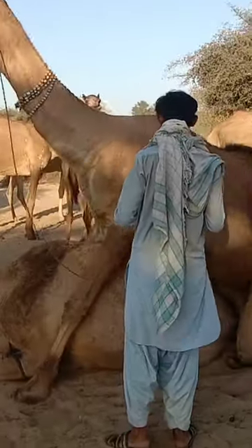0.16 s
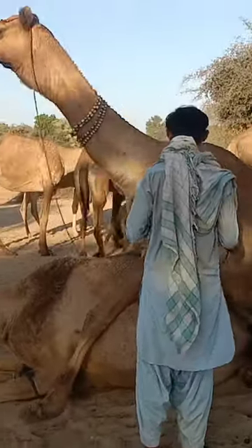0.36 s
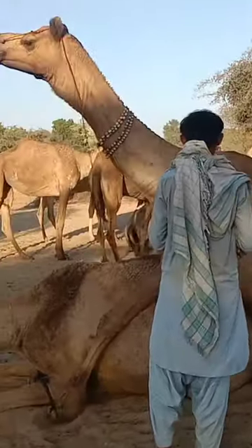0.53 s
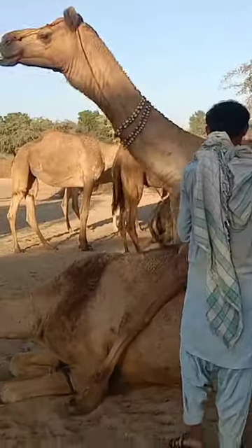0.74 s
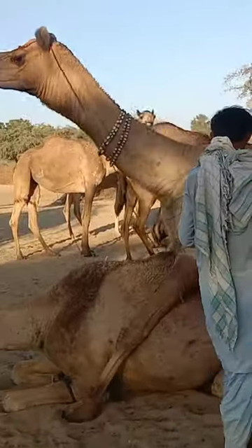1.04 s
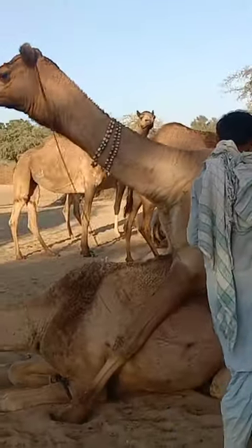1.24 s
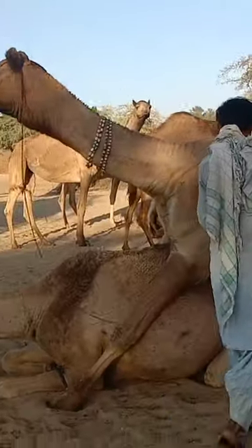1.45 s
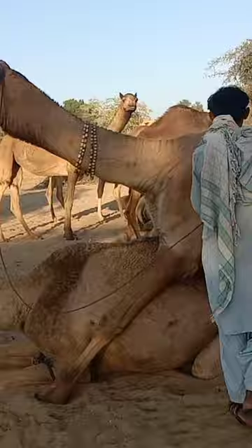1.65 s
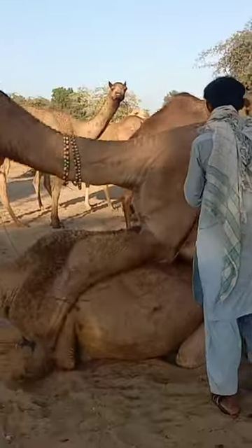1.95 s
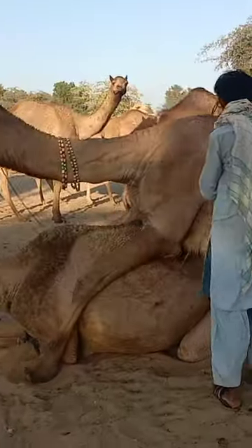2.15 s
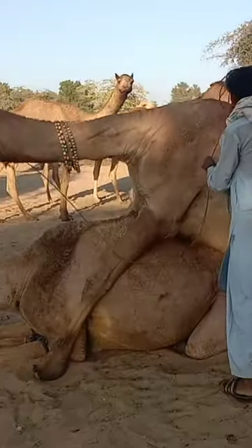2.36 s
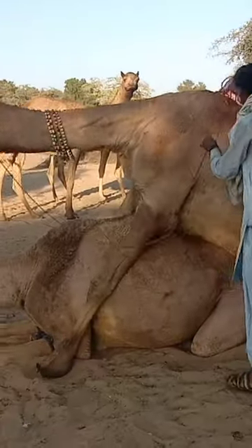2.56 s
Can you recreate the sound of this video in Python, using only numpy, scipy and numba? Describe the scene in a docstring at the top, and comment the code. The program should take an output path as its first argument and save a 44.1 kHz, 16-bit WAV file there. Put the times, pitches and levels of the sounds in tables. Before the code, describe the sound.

A camel lets out one long, low bellow a few metres away on open sand. The groan pulses and gurgles roughly, grows raspier with wet breath, and closes with a brief thin wheeze.

```python
"""Open sand, a few metres from a camel that gives one long, rough bellow.
Its larynx beats unevenly near 95 Hz and hums through the throat; each beat flaps loose tissue that
rings the open mouth, now and then with a hard slap. Wet air rasps between the beats and a thin wheeze
closes the call. The ground and nearby bodies add a short echo over a very quiet bed of open air."""
import sys
import numpy as np
from scipy import signal
from scipy.fft import rfft, irfft
from scipy.io import wavfile
from scipy.ndimage import uniform_filter1d, minimum_filter1d
from numba import njit

SR = 44100
rng = np.random.default_rng(int(sys.argv[2]) if len(sys.argv) > 2 else 0)


def bounce(signal):
    """Save signal as a 16-bit WAV file at the path given by the first command-line argument."""
    frames = np.transpose(np.atleast_2d(signal))
    limited = np.clip(frames, -1, 1)
    pcm = np.round(limited * 32767).astype(np.int16)
    wavfile.write(sys.argv[1], SR, pcm)


N = 119070

# throat hum, the third harmonic of the larynx: time_s, pitch_hz
HUM_PITCH = [(0.2,223.2),(0.28,267.9),(0.37,283.6),(0.44,313.7),(0.64,305),(0.73,320.6),(0.82,304.1),(0.88,282.4),(0.97,302.3),(1.04,271.7),(1.31,266.8),(1.5,290.8),(1.65,275.1),(2.12,271.3),(2.21,294.1),(2.3,284.4),(2.4,266),(2.47,207.6)]
# envelope of the soft flaps, before their gain: time_s, level_db
FLUTTER_LEVEL = [(0.19,-81),(0.205,-39),(0.27,-25.5),(0.36,-17),(0.5,-22.5),(0.68,-25),(0.81,-23),(0.87,-28),(1.0,-23.5),(1.22,-25),(1.36,-24),(1.5,-25),(1.63,-25.5),(1.95,-24),(2.1,-26),(2.27,-21),(2.425,-28.5),(2.47,-53),(2.53,-90)]
# hard slaps of loose tissue: start_s, level_db
HARD_SLAPS = [(0.2292, -20.5), (0.2861, -13), (0.3239, -9), (0.353, -19.5), (0.3702, -10.5), (0.3901, -9),
              (0.4077, -10.5), (0.4251, -9), (0.4541, -12.5), (0.4733, -11), (0.5026, -10), (0.5857, -6.5),
              (0.6063, -9), (0.6611, -7.0), (0.6717, -6), (0.6806, -9.0), (0.6905, -6.5), (0.7551, -6),
              (0.7745, -6), (0.7951, -8), (0.8143, -6), (0.8845, -10.5), (0.946, -6.5), (0.9854, -10),
              (0.9959, -10.0), (1.0169, -10.0), (1.0287, -10), (1.0714, -10), (1.0822, -10.0),
              (1.1376, -8.5), (1.1712, -10.5), (1.2752, -8.5), (1.2985, -7.5), (1.3797, -9), (1.4085, -8),
              (1.4431, -8), (1.455, -10.5), (1.4925, -9), (1.5137, -6.5), (1.5411, -6.5), (1.5869, -8.5),
              (1.6267, -8.5), (1.6585, -8), (1.6918, -8.5), (1.7098, -10), (1.7385, -11), (1.7619, -9),
              (1.7814, -5), (1.8341, -12.5), (1.8519, -7.5), (1.8753, -9.5), (1.8931, -7.5),
              (1.9046, -12.5), (1.9219, -11), (1.9339, -7), (1.949, -9), (2.066, -8.5), (2.0833, -8),
              (2.0978, -1.5), (2.1255, -11.5), (2.1326, -9), (2.1438, -5.5), (2.1765, -9), (2.1857, -10.5),
              (2.2146, -2.5), (2.229, -8.5), (2.2481, -2.5), (2.2713, -8.5), (2.285, -7), (2.3098, -11),
              (2.3284, -10.0), (2.3722, -12.5), (2.3847, -12)]
# open-mouth resonances, two for the jaw, then the tongue's: centre_hz, width_hz, gain_db
MOUTH_FORMANTS = [(833.6,163,-8),(924.2,108,8),(1213.4,49,-2),(1419,88,-1.5),(1541,90,-0.5),(1642,42,-4)]
# mouth shape, retuning those resonances: time_s, jaw_ratio, tongue_ratio, nasal_db
MOUTH_SHAPE = [(0.2,0.74,0.86,-10),(0.36,1.036,0.97,-13),(0.65,1.063,1.064,-19.5),(0.8,1,1.043,-16),(0.9,0.99,0.93,-15),(1.05,0.96,0.96,-19),(1.22,1.057,1.01,-15),(1.4,0.95,0.97,-18.5),(1.53,0.995,1.03,-18.5),(1.76,0.98,0.96,-28),(2.03,0.97,0.95,-19),(2.28,1.037,1.003,-13.5),(2.46,0.88,0.91,-11)]
# shared envelope of boom, hum and thud: time_s, level_db
THROAT_LEVEL = [(0.16,-68),(0.205,-39),(0.26,-30),(0.35,-26),(0.45,-28.5),(0.62,-30.5),(0.76,-30),(0.88,-31.5),(0.97,-27.5),(1.09,-26.5),(1.25,-31.5),(1.45,-29.5),(1.72,-29.5),(2.03,-27.5),(2.09,-27.5),(2.43,-29),(2.49,-49),(2.53,-100.5)]
# throat resonances at the average pitch: centre_hz, width_hz, gain_db
THROAT_FORMANTS = [(187.5,6.5,-5.5),(230,45,-4),(273,17,2.5),(398,15,-14)]
# soft knocks before the voice catches, before their gain: start_s, level_db
THROAT_KNOCKS = [(0.063,-76.5),(0.089,-59.5),(0.11,-53.5),(0.137,-47.5),(0.164,-65),(0.184,-46)]
# envelopes of the four breath bands, low to high: time_s, edge_db, rasp_db, squeeze_db, hiss_db
BREATH_LEVELS = [(0.18,-105,-76.5,-97,-86.5),(0.31,-70.5,-68,-84.5,-59),(0.4,-70,-73.5,-80,-61),(0.47,-53,-78.5,-74.5,-65.5),(0.68,-53.5,-73.5,-81.5,-56),(0.86,-63,-70,-73,-66.5),(0.95,-59,-63,-72,-64.5),(1.08,-78.5,-73.5,-82,-68.5),(1.52,-78.5,-59.5,-61,-68.5),(1.73,-62.5,-53,-67.5,-62),(1.92,-57,-46.5,-59,-68),(2.05,-54,-49.5,-58,-60),(2.24,-55.5,-47.5,-52,-55),(2.41,-54,-62,-61.5,-64.5),(2.52,-97.5,-93.5,-94,-95.5)]
# narrow throat bands that rasp: centre_hz, width_hz, gain_db
RASP_BANDS = [(3300,230,3.5),(3645,440,1.5)]
# lip and teeth resonances that hiss: centre_hz, width_hz, gain_db
HISS_BANDS = [(4820,590,-2.5),(5490,190,5),(6160,330,1)]
# lip shape, retuning the hiss: time_s, ratio
LIP_SHAPE = [(0.3,1.0),(0.7,1.03),(1.3,.98),(1.75,1.04),(1.95,1.12),(2.2,.98),(2.45,1.1)]
# closing wheeze: time_s, pitch_hz, level_db
WHEEZE_PATH = [(2.41,3060,-67),(2.438,3060,-37),(2.455,2760,-53),(2.472,2805,-41),(2.51,2880,-85),(2.53,2660,-100)]
# tone of the open-air bed: frequency_hz, gain_db
AIR_SPECTRUM = [(25, -13), (80, 6.5), (190, -5.5), (350, -13), (850, -5.5), (1400, -8), (3200, -13),
                (4000, -26.5), (15000, -19.5)]

JITTER_BEATS, SLAP_CLEAR_S, TURBULENCE_S, PUFF_S = 0.21, 0.006, 0.003, 0.004
FLUTTER_GAIN_DB, GURGLE_GAIN_DB, TURBULENCE_GAIN_DB, SPRAY_GAIN_DB = 10, -2, -7, -25.5
BOOM_GAIN_DB, HUM_GAIN_DB, KNOCK_GAIN_DB, THUD_GAIN_DB = -4, -4.5, 6.5, -31.5
MOUTH_LOW_HZ, MOUTH_TOP_HZ, NASAL_HZ = 713, 1769, 2470
HUM_WAVER, JAW_WAVER, TONGUE_WAVER, WHEEZE_WAVER = 0.026, 0.01, 0.025, 0.025  # fractions of frequency
ECHO_DB, ECHO_T60_S, TAIL_DB, TAIL_T60_S, AIR_BED_DB = -11.5, 0.075, -55, 0.6, -77
LIMIT_DB, LIMIT_S, TOP_HZ = -4.5, 0.018, 15600


def undb(db):
    return 10 ** (np.asarray(db) / 20)


def unit(x):
    return x / np.sqrt(np.mean(x ** 2))


def curve(table, column=1):
    """A table column as an envelope of straight ramps."""
    rows = np.array(table)
    return np.interp(np.arange(N) / SR, rows[:, 0], rows[:, column])


def drift(rate_hz):
    """Smooth random modulation with an RMS of 1."""
    hold = max(int(SR / rate_hz), 1)
    steps = np.repeat(rng.standard_normal(N)[:N // hold + 1], hold)
    return unit(uniform_filter1d(uniform_filter1d(steps, hold), hold)[:N])


def cut(x, hz, kind, order):
    return signal.sosfilt(signal.butter(order, hz, kind, fs=SR, output="sos"), x)


@njit
def swept_bandpass(x, hz, width_hz):
    """State-variable filter, retuned every sample."""
    out, band_state, low_state = np.empty(len(x)), 0., 0.
    for i in range(len(x)):
        tuning, damping = np.tan(np.pi * hz[i] / SR), width_hz / hz[i]
        band = (band_state + tuning * (x[i] + 1e-18 - low_state)) / (1 + tuning * (tuning + damping))
        band_state = 2 * band - band_state
        low_state += 2 * tuning * band
        out[i] = damping * band
    return out


def ring(x, hz, width_hz):
    """One resonance whose centre may move."""
    return swept_bandpass(x, hz * np.ones(N), float(width_hz))


def steep_ring(x, hz, width_hz):
    """A resonance with steeper skirts."""
    return ring(ring(x, hz, width_hz), hz, 2 * width_hz)


def clicks(times, sizes):
    """One impulse at each time."""
    out = np.zeros(N)
    np.add.at(out, np.clip((np.asarray(times) * SR).astype(int), 0, N - 1), sizes)
    return out


def decay(tau_s):
    return np.exp(-np.arange(SR // 2) / SR / tau_s)


def convolve(x, response):
    return signal.fftconvolve(x, response)[:N]


def larynx():
    """The larynx beats once every three hum cycles; gives the running cycle count and beat times."""
    hum_hz = curve(HUM_PITCH) * (1 + HUM_WAVER * drift(70))
    cycles = np.cumsum(hum_hz) / SR
    beats = np.flatnonzero(np.diff(cycles // 3)) / SR
    return cycles, beats


def tissue_flaps(beats):
    """Tissue flaps loosely on each beat and gurgles between; a hard slap replaces any flap close by."""
    flap_lag, size, gurgle_lag, gurgle_size = rng.standard_normal((400, 4))[:len(beats)].T
    period = np.gradient(beats)
    flap_s = beats + JITTER_BEATS * flap_lag * period
    gurgle_s = beats + (0.5 + JITTER_BEATS * gurgle_lag) * period
    slap_s, slap_db = np.array(HARD_SLAPS).T
    clear = lambda times: np.abs(times[:, None] - slap_s).min(axis=1) > SLAP_CLEAR_S
    soft = clicks(flap_s, clear(flap_s) * undb(-0.5 * np.minimum(size, 1)))
    soft += clicks(gurgle_s, clear(gurgle_s) * gurgle_size * undb(GURGLE_GAIN_DB))
    # soft flaps trail turbulence and sound duller than slaps
    burst = decay(TURBULENCE_S)
    turbulence = convolve(np.abs(soft), burst / np.linalg.norm(burst)) * rng.standard_normal(N)
    soft = cut(soft + undb(TURBULENCE_GAIN_DB) * turbulence, 2290, "low", order=1)
    flutter_db = curve(FLUTTER_LEVEL) + FLUTTER_GAIN_DB + 1.2 * drift(45.35)
    return soft * undb(flutter_db) + clicks(slap_s, undb(slap_db))


def mouth(x, jaw, tongue, nasal_db, swell_db):
    """Tongue resonances answer at once, the jaw's coupled pair swells; a weak nasal one sits on top."""
    jaw_low, jaw_high = (undb(db) * ring(x, hz * jaw, width) for hz, width, db in MOUTH_FORMANTS[:2])
    upper = sum(undb(db) * ring(x, hz * tongue, width) for hz, width, db in MOUTH_FORMANTS[2:])
    oral = cut(jaw_high - jaw_low + undb(swell_db) * upper, MOUTH_LOW_HZ, "high", order=5)
    oral = cut(oral, MOUTH_TOP_HZ, "low", order=14)
    nasal = cut(steep_ring(x, NASAL_HZ * tongue, width_hz=400), 2637, "low", order=12)
    return oral + undb(nasal_db - 0.5) * nasal


def roar(flaps):
    """The flaps ring the mouth as jaw and tongue move, scaled by the peak of a single flap."""
    jaw = curve(MOUTH_SHAPE, 1) * (1 + JAW_WAVER * drift(35))
    tongue = curve(MOUTH_SHAPE, 2) * (1 + TONGUE_WAVER * drift(35))
    one_flap = mouth(clicks([0], 0.94), jaw=0.96, tongue=1, nasal_db=-20.5, swell_db=0)
    voice = mouth(flaps, jaw, tongue, nasal_db=curve(MOUTH_SHAPE, 3), swell_db=1.8 * drift(60))
    return voice / np.abs(one_flap).max()


def throat(cycles, beats):
    """The body of the call: beats boom in the throat around a wavering hum."""
    lag, size = rng.standard_normal((400, 2))[:len(beats)].T
    pulses = clicks(beats + 0.0015 * lag, undb(3.7 * size))
    pitch_ratio = curve(HUM_PITCH) / np.mean(curve(HUM_PITCH))
    boom = sum(undb(db) * ring(pulses, hz * pitch_ratio, width) for hz, width, db in THROAT_FORMANTS)
    boom = cut(cut(boom, 420, "low", order=4), 170, "high", order=2)
    hum = np.sin(2 * np.pi * cycles) * undb(0.5 * drift(30))
    return undb(curve(THROAT_LEVEL)) * (undb(BOOM_GAIN_DB) * unit(boom) + undb(HUM_GAIN_DB) * unit(hum))


def knocks():
    """Muffled knocks ring the throat before the voice catches."""
    def body(x):
        return cut(ring(ring(x, 220, width_hz=100), 300, width_hz=110), 230, "low", order=4)
    start_s, level_db = np.array(THROAT_KNOCKS).T
    one_knock_peak = np.abs(body(clicks([0], 0.99))).max()
    return body(clicks(start_s, undb(level_db + KNOCK_GAIN_DB))) / one_knock_peak


def thud(beats):
    """Each beat adds a faint low thud in the throat."""
    thumps = clicks(beats, rng.standard_normal(N)[:len(beats)])
    low_end = cut(ring(thumps, 110, width_hz=69), 160, "low", order=2)
    return undb(curve(THROAT_LEVEL) + THUD_GAIN_DB) * unit(low_end)


def wet_air(flaps):
    """A puff of air follows each flap, rasps in narrow bands of the throat and hisses past the teeth."""
    puffs = np.abs(convolve(flaps, decay(PUFF_S) * (1 - decay(0.0044))))
    flow = puffs / (uniform_filter1d(puffs, SR // 8) + 1e-6) + 0.43  # levelled puffs over steady breath

    def band(hz, width_hz, flicker_db):
        breath = unit(flow * rng.standard_normal(N)) * undb(flicker_db * drift(29))
        return steep_ring(breath, hz, width_hz)

    def spatter(hz, width_hz):
        fizz = np.sqrt(flow) * rng.standard_normal(N) * undb(3 * drift(150))
        return ring(fizz, hz, width_hz)

    edge = unit(band(2400, width_hz=700, flicker_db=2))
    rasp = unit(sum(undb(db) * band(hz, width, flicker_db=4.8) for hz, width, db in RASP_BANDS))
    squeeze = unit(band(4676, width_hz=300, flicker_db=3))
    hiss = np.zeros(N)
    for hz, width, db in HISS_BANDS:
        centre_hz = hz * curve(LIP_SHAPE) * (1 + TONGUE_WAVER * drift(14))
        hiss += undb(db) * band(centre_hz, width, flicker_db=3.5)
    spray = undb(SPRAY_GAIN_DB) * unit(spatter(11000, width_hz=4000) + spatter(8000, width_hz=1500))
    layers = edge, rasp + spray, squeeze, unit(hiss) + spray
    return sum(undb(curve(BREATH_LEVELS, column)) * layer for column, layer in enumerate(layers, 1))


def wheeze():
    """A thin, unsteady whistle with a faint octave, heard only as the mouth closes."""
    t = np.arange(N) / SR
    pitch_hz = curve(WHEEZE_PATH) * (1 + WHEEZE_WAVER * drift(400))
    phase = 2 * np.pi * np.cumsum(pitch_hz) / SR
    gate = (t > WHEEZE_PATH[0][0]) & (t < WHEEZE_PATH[-1][0])
    return gate * undb(curve(WHEEZE_PATH, 2)) * (np.sin(phase) + undb(-13.5) * np.sin(2 * phase))


def outdoors(x):
    """Short scatter from the sand and the herd, and a faint far tail."""
    def echo(t60_s):
        response = rng.standard_normal(SR // 2) * decay(t60_s / np.log(1000))
        response[:int(0.004 * SR)] = 0  # pre-delay
        return convolve(x, response / np.linalg.norm(response))
    return x + undb(ECHO_DB) * echo(ECHO_T60_S) + undb(TAIL_DB) * echo(TAIL_T60_S)


def open_air():
    """A very quiet, bass-heavy bed of air whose level wavers."""
    hz, db = np.array(AIR_SPECTRUM).T
    bin_hz = np.arange(N // 2 + 1) * SR / N
    colour = undb(np.interp(np.log(bin_hz + 1), np.log(hz), db))
    level = undb(AIR_BED_DB + 1.3 * drift(8))
    return level * unit(irfft(rfft(rng.standard_normal(N)) * colour, N))


def scene():
    """The bellow and its echo over the air bed, in mono."""
    cycles, beats = larynx()
    flaps = tissue_flaps(beats)
    bellow = roar(flaps) + thud(beats) + throat(cycles, beats) + knocks() + wet_air(flaps) + wheeze()
    return (outdoors(bellow) + open_air())[None]


def record(dry):
    """A limiter ducks briefly for the hardest slaps, then a steep low-pass trims the top."""
    window = int(LIMIT_S * SR)
    gain = np.minimum(undb(LIMIT_DB) / (np.abs(dry) + 1e-9), 1)
    held = minimum_filter1d(gain, 2 * window)
    smoothed = uniform_filter1d(uniform_filter1d(held, window), window)
    return signal.sosfilt(signal.ellip(8, 0.2, 70, TOP_HZ, fs=SR, output="sos"), dry * smoothed)


dry = scene()
out = record(dry)
bounce(out)
```